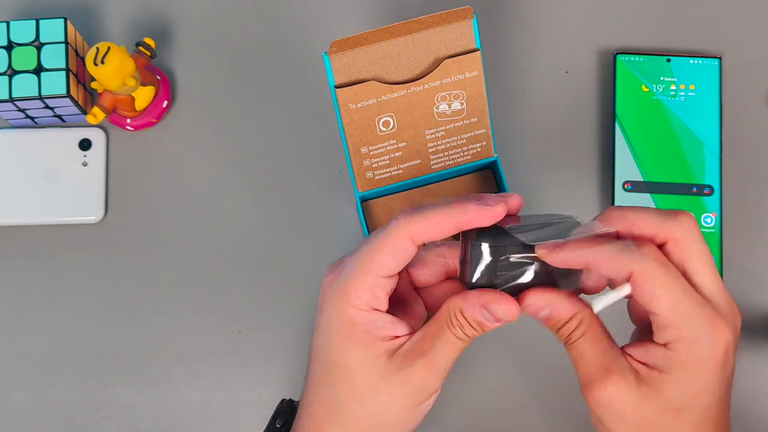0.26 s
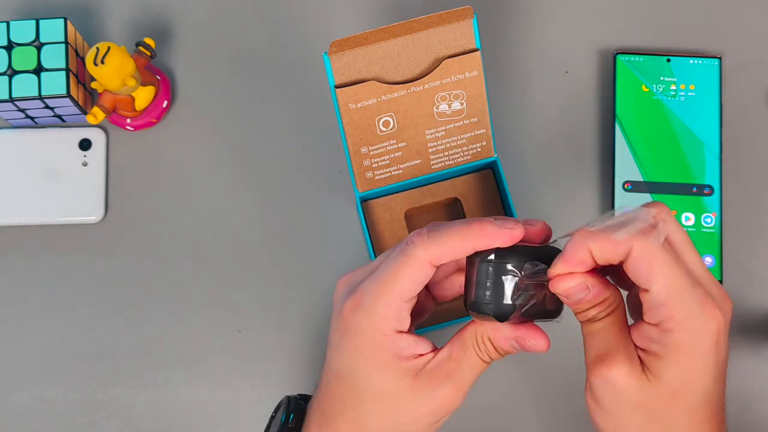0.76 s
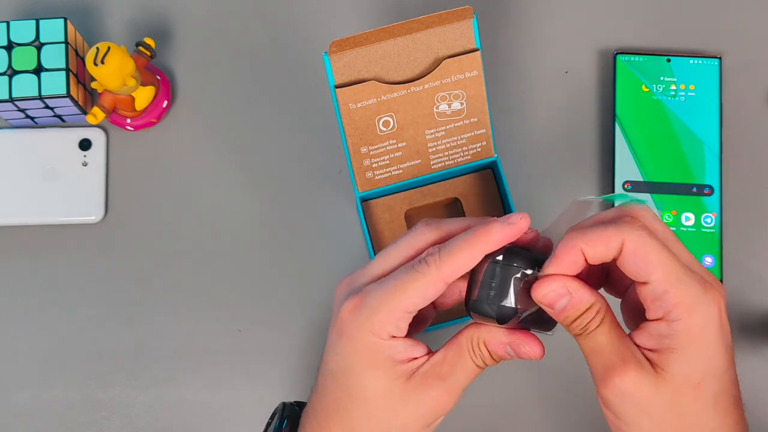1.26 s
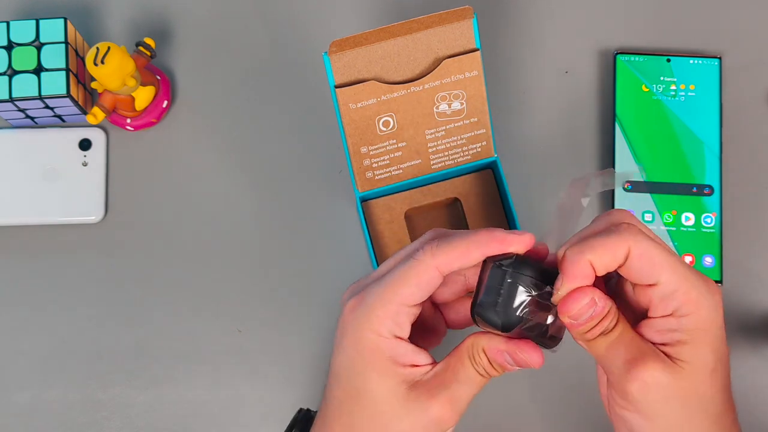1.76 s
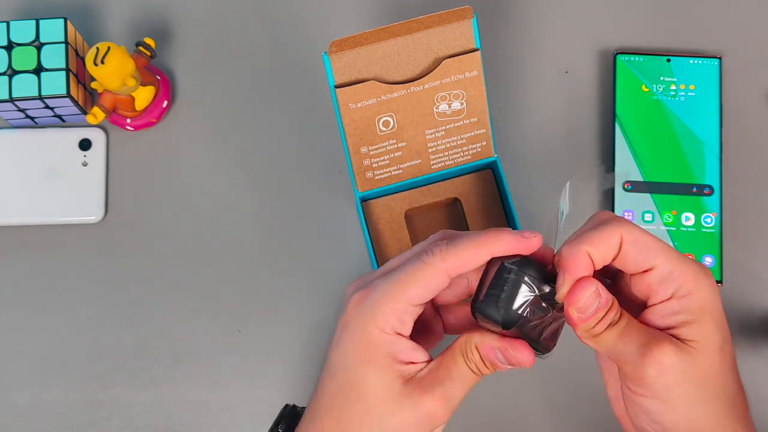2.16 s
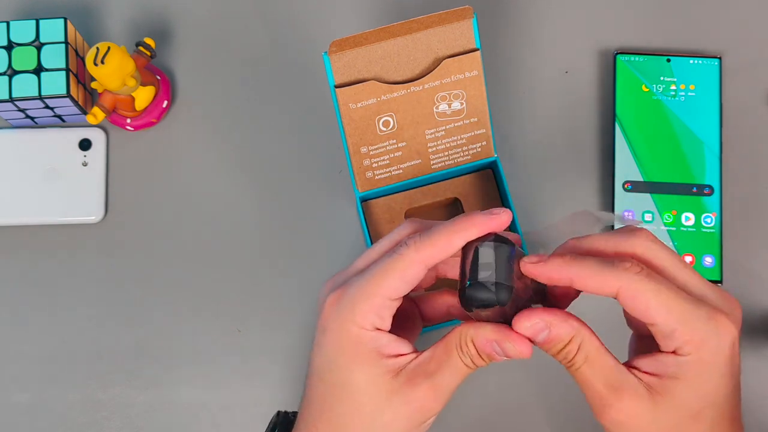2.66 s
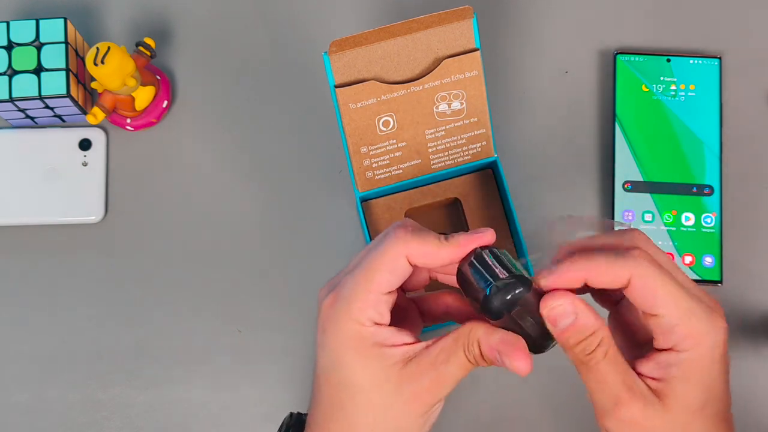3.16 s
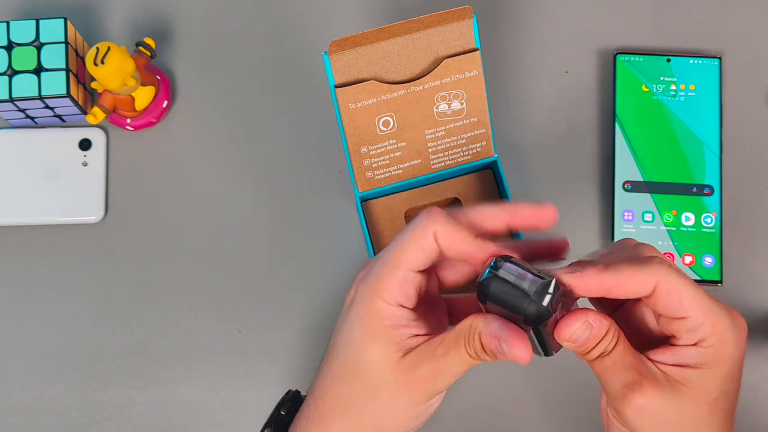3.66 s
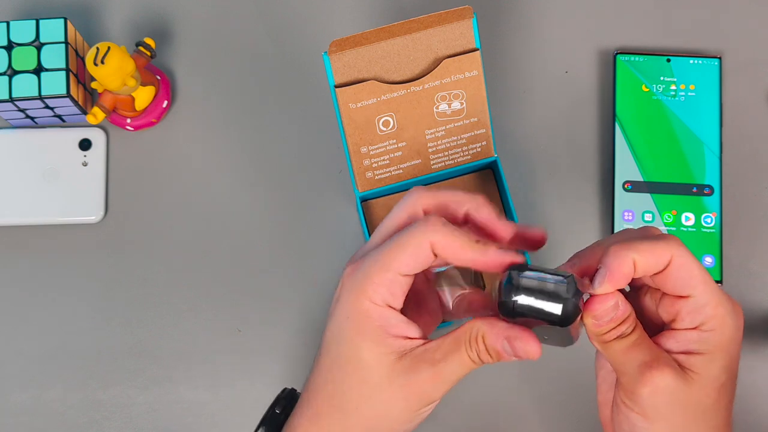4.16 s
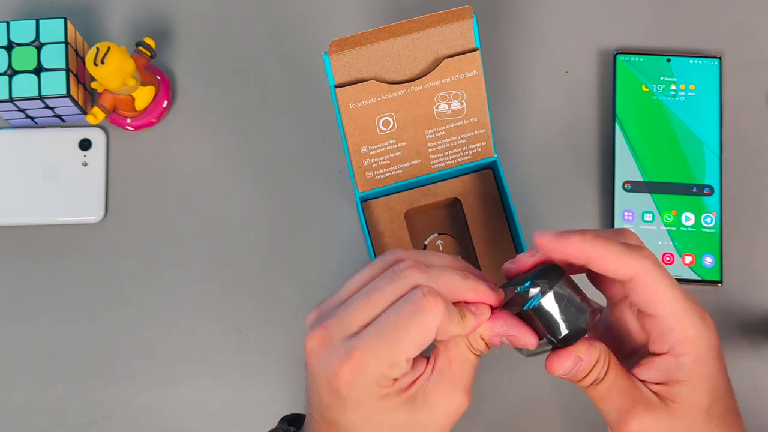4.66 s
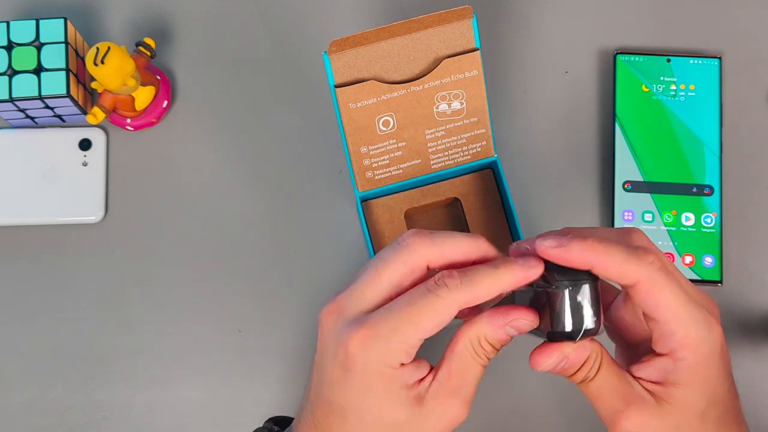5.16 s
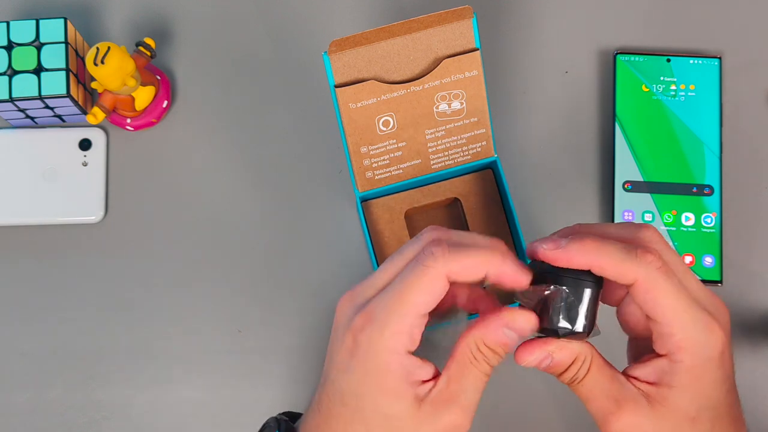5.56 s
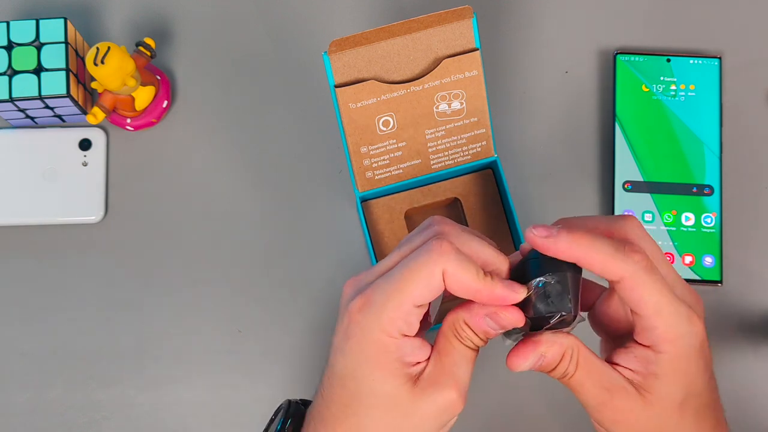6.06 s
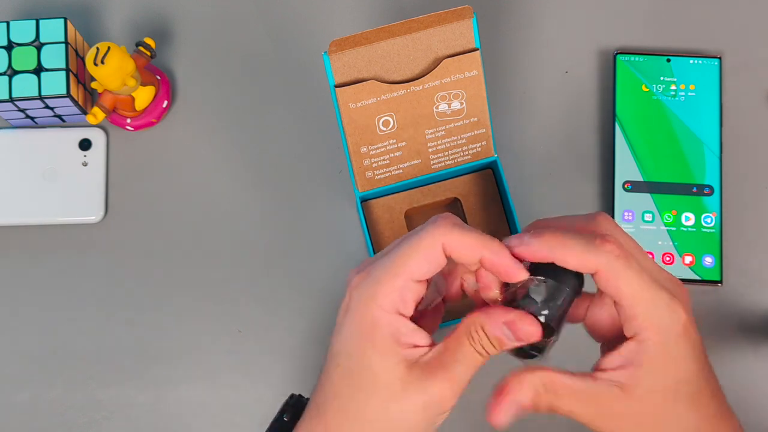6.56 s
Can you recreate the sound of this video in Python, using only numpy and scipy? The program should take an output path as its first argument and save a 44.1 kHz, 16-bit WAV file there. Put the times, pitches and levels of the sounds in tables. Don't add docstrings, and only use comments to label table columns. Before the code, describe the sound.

Close, dry crackles of peeling plastic wrap, a quick sticky zip, one loud pop, then thick crinkling in a quiet furnished room.

```python
import sys
import numpy as np
from scipy import signal
from scipy.fft import rfft, irfft
from scipy.io import wavfile
from scipy.ndimage import uniform_filter1d

SR = 44100
rng = np.random.default_rng(int(sys.argv[2]) if len(sys.argv) > 2 else 0)


def convert_level_to_amplitude(level_db):
    exponent = np.asarray(level_db, float) / 20
    return 10 ** exponent


def put_to_file(sound):
    columns = np.atleast_2d(sound).T
    safe = np.clip(columns, -1, 1)
    whole_steps = np.round(safe * 32767)
    wavfile.write(sys.argv[1], SR, whole_steps.astype(np.int16))


N = 300762
LEAD = 32

# (time [s], level [dB], brightness [dB per octave], large fold joins in [dB])
FOLD_SNAPS = [(0.4276, -48.5, 3, -11), (0.5908, -40, -9.5, -8), (0.6515, -57.5, -2, 15.5),
              (0.7751, -50, -10.5, -3.5), (0.9858, -50, 0, -47), (1.6247, -47.5, 0.5, -1),
              (1.6624, -49.5, 1, 13), (1.6738, -47, 2, 10), (2.3732, -48.5, 4, 13), (2.7469, -72, -9.5, 30),
              (2.9037, -50.5, -4, -4), (2.9272, -57.5, 7.5, 0), (3.3205, -35, -7, 0), (3.8573, -39, -9, 1),
              (4.0783, -40.5, -2, 5), (4.3253, -54, 7, 5), (4.33, -40.5, 0, -5), (4.3681, -45, 7, 5),
              (4.408, -39, -5.5, 11), (4.5563, -53, 2, -17), (4.9509, -36.5, -7, 9.5),
              (5.0838, -49.5, -14, 18), (5.1285, -45, -5, 14), (5.2947, -36.5, -3, -10),
              (5.3586, -44.5, -8, 6.5), (5.942, -37.5, -4.8, 2.5), (6.1924, -40.5, 14, -17),
              (6.2621, -48.5, -15, 0), (6.3422, -45.5, -8, -10)]
RIDGE_SNAPS = [(1.2905, -55.5, -3, -6), (1.4052, -58.5, -4.5, -8), (2.196, -38, 5.5, -7),
               (2.4087, -39, 6, 10), (3.0166, -57, 0, -7), (3.3149, -54, 5, 16), (3.4549, -47, 7, -10),
               (3.8842, -34.5, -5.5, -22), (4.6944, -35.5, -3, 5), (5.09, -40, -5, 3),
               (5.4295, -37.5, -7.5, 5), (5.4662, -34.5, -2, 12.5), (5.6369, -62, -1, 13),
               (6.1051, -35, 0.5, 8), (6.3381, -48, -3, -19), (6.5135, -33, 1, -24), (6.55, -47, 7, -9),
               (6.5684, -47, 0, -11), (6.7453, -47, -3, -7), (6.7611, -38.5, -0.5, -1),
               (6.8074, -33, -6, -10)]
PANEL_SNAPS = [(1.036, -67, 5, -15), (1.2119, -61, 3, -12), (1.2858, -61.5, 1, 26),
               (1.3236, -58.5, -3.5, -6), (1.6557, -63, -9, 17), (1.7856, -23, -2.5, 3.0),
               (2.1385, -72, -13, -14), (2.3975, -37.5, 4, 4), (3.0212, -39, 4.5, -2),
               (3.3326, -32.5, 5.5, -5), (3.4346, -44, -0.5, 17.5), (3.484, -38, 1.5, -4),
               (3.5124, -39, -1.5, -6), (3.929, -27, 4, 1), (4.1209, -41, -0.5, -8), (4.241, -56, -4, 13),
               (4.35, -39.5, 3, 11.5), (4.3954, -37.5, -2.5, 2.5), (4.7274, -42.5, -0.5, -1),
               (4.932, -56, 9, 0), (5.658, -48, 1.5, -10), (6.0587, -43.5, -2.5, -5),
               (6.0859, -40.5, -3, -10), (6.1621, -47.5, 3.5, 3), (6.1782, -47.5, -10, -5),
               (6.2415, -57.5, 0, 15), (6.4039, -52, 6, -5), (6.4351, -49, 5, 1)]
SHEET_SNAPS = [(0.1748, -46.5, -5, 15), (0.3764, -65, 0, 0), (0.7399, -65, 4, -8.5),
               (1.3615, -48, 4.5, -10), (1.4376, -42, -5, -8), (1.7214, -32.5, -0.5, -8),
               (2.121, -55, -10.5, 4), (2.175, -83, -3, 10), (2.3652, -55, -3, 1), (2.4184, -45.5, 5.5, 10),
               (3.1313, -53, -2.5, 12), (3.2869, -53.5, -3, 5), (3.5228, -55, -15, 14),
               (3.8408, -37.5, -1, 19.5), (4.2154, -52, -4, 5), (4.5236, -46.5, 2.5, -8),
               (4.7193, -43.5, -4, 13), (4.8297, -41, 7, -15), (5.1778, -41.5, -1.5, -4),
               (5.4212, -60.5, -11, 9), (5.4474, -68, 5, 5), (5.5044, -48.5, -7.5, 8),
               (5.6526, -58, -1, 15.5), (5.8209, -62, -12, -11), (5.853, -31, -0.5, -6.5),
               (6.0474, -41.5, 1, -10), (6.5586, -42, -4, 0), (6.5858, -47.5, -10, 15),
               (6.6204, -47.5, -3.5, 3), (6.787, -48.5, 4, 6)]
CREASE_SNAPS = [
    (0.2417, -45.5, 2, 13),
    (0.5455, -34.5, -7.5, -3),
    (1.4285, -50, 6, 5),
    (3.4897, -40, 0, 17),
    (4.5016, -47, -3, 5),
    (4.8453, -28, -2, -31),
    (6.521, -31, 0.5, 5.5),
]
TAUT_SNAPS = [(0.3842, -77.5, -14, -16), (0.7461, -74, 3, 5), (1.0668, -52, 8, -18),
              (1.1994, -62.5, 3.5, 5), (2.3774, -34.5, 1.5, -25), (2.5291, -64, -1, 9.5),
              (3.9049, -35, 8, -4), (4.037, -38, 0, -1), (4.0591, -38.5, 1.5, 2.5), (4.246, -66, -22, 11),
              (4.2537, -48, -2, -18), (4.2885, -35, 0.5, 8.5), (4.678, -42, 2, -2), (4.685, -54, -4, -2),
              (4.7927, -40.5, 7.5, 5), (4.8221, -40, 9, -22.8), (4.8415, -46, 6, -4), (4.8605, -47, 6, -17),
              (4.912, -39, 2, -5.5), (5.0979, -31.5, 3, 6.5), (5.2613, -61, 0, 7), (5.8403, -53, 7, 10),
              (5.9951, -39, 0, 5.5), (6.3877, -61, 8, 15), (6.418, -40, 9.5, -3), (6.4574, -34, 4, 0.5),
              (6.6125, -47.5, 2, 2), (6.6777, -41.5, 7, -19), (6.7527, -69, -17, 19)]
# (snaps, large fold [dB], panel [dB], ridge [dB], crease [dB], fine edge [dB])
KINDS = [
    (FOLD_SNAPS, -14.5, -16, 0, -4.5, -15.5),
    (RIDGE_SNAPS, -15, -9.5, 0, -9, -12),
    (PANEL_SNAPS, -11.5, 0, -6.5, 0, -11),
    (SHEET_SNAPS, -11.5, -9.5, -1.5, 0, -9),
    (CREASE_SNAPS, -22.5, -11, -12.5, 0, -20.5),
    (TAUT_SNAPS, -11, 0, 0, -3.5, -8.5),
]
SNAPS = sorted((*row, kind[1:]) for kind in KINDS for row in kind[0])
PARTS_HZ = [900, 2600, 5700, 8900, 13200]
# (frequency [Hz], t60 [s])
SNAP_T60 = [(500, 0.019), (2000, 0.011), (6000, 0.011), (15000, 0.0092)]
EARLIER_PARTS = (-48.5, -47, -43.5, -41.5, -50)
SHARP_TIMES = [1.4376, 1.7214, 1.7856, 2.196, 2.3774, 2.4087, 3.484, 3.9049, 4.408, 6.0587, 6.1924, 6.6777,
               6.8074]
# (duration [s], head start [s], times [s])
TEARS = [
    (.004, .0004, [.5467, 1.4285, 2.4184, 3.1313, 3.3326, 3.4346, 3.4889, 3.5124, 5.2947, 4.2557, 3.929, 5.0978, 6.4582, 4.912]),
    (.008, .001, [1.1994, 1.3236, 1.6247, 6.3422, 3.8408, 4.0591, 4.1209, 4.2161, 5.942]),
    (.013, .004, [3.4549, 3.8573, 4.0783, 4.2883, 4.3306, 4.3686, 5.1285, 5.5046]),
]
# (time [s], centre [Hz], level [dB])
SNAP_TINTS = [(0.4276, 2330.0, 10), (0.7751, 2120, 9.5), (1.0668, 6000.0, 6), (1.3615, 5640, 6),
              (1.6624, 6000.0, 11.5), (1.7856, 15100, 13), (3.1313, 6460, 6.5), (3.3205, 13600.0, 6),
              (3.4346, 6400.0, 11), (3.5124, 13200.0, 8), (3.8408, 12800.0, 5), (3.8842, 12000.0, 7.7),
              (3.9049, 8400.0, 3), (4.037, 4860, 6), (4.0591, 2960, 7.5), (4.33, 2360, 16), (4.3954, 1630, 1),
              (4.408, 11500, 15), (4.6944, 2730, 5.5), (4.7927, 3620, 7.5), (4.912, 2470, 5.5),
              (4.9509, 2710, 8.5), (5.4295, 1380, 7.5), (5.4652, 4940, 3.5), (5.658, 1750, 7.5),
              (5.9951, 1340, 9), (6.0474, 1230, 12), (6.0587, 1540, 13.5), (6.0587, 7160, 11),
              (6.0859, 5560, 8.5), (6.1051, 2360, 7.5), (6.1051, 9200, 10), (6.2621, 5350, 6),
              (6.4574, 1230, 9.5), (6.521, 14800.0, 13), (6.5586, 14000.0, 8), (6.6204, 1900, 11),
              (6.6777, 10400, 5.5), (6.7611, 1940.0, 6.5),
              (0.1748, 1340, -7), (0.4276, 8100, -3), (0.7751, 5230, -7), (1.3615, 11000, -5),
          (1.3615, 14600, -21), (1.6247, 3680, -14), (1.6624, 11200.0, -5.3), (1.7214, 11600.0, -11),
          (1.7856, 2620, -6.5), (1.7856, 5500, -8), (2.196, 13200, -15), (2.3774, 2510, -11),
          (2.3774, 12400.0, -11), (3.1313, 1050, -10.5), (3.4346, 1460, -15), (3.8408, 1230, -18),
          (3.929, 1810, -4), (3.929, 11000, -9.5), (4.037, 1910, -10), (4.3954, 2170, -11),
          (4.678, 14800.0, -9), (4.6944, 4730, -9), (4.7927, 13200.0, -10), (4.8453, 9200.0, -11),
          (4.9509, 2020, -5), (5.0973, 6400.0, -6), (5.4652, 2870, -10), (6.0587, 10000.0, -3.7),
          (6.0859, 1770.0, -8), (6.0859, 11200.0, -8), (6.1051, 6200, -8), (6.1051, 13900, -4),
          (6.1794, 5200.0, -4.5), (6.1924, 10000.0, -5.9), (6.2621, 3580, -11), (6.418, 3300, -13),
          (6.4574, 7260, -10), (6.4574, 14800.0, -7), (6.7611, 14400.0, -7.9), (6.8074, 7200.0, -6),
              (.1748, 13000, -5), (.5467, 2240, 5.5), (1.7856, 695, -3.5), (2.196, 2880, 11.5),
         (3.0212, 1640, 2.5), (3.0212, 4520, -8), (3.929, 2840, 5.5), (5.0973, 686, -10), (5.0973, 2630, 9),
         (5.0973, 3670, 6), (5.4295, 2180, -8), (6.1051, 5160, 10.5), (1.4376, 3100, -10),
         (4.9509, 3280, 0), (6.8074, 3020, 0)]
# (time [s], centre [Hz], level [dB])
THUDS = [(.7751, 845, 13.5), (3.3326, 503, 12), (3.484, 202, 24), (3.8408, 480, -2), (4.2885, 300, 8),
         (4.408, 250, 16), (4.678, 300, 18), (4.7274, 353, 27), (4.7927, 300, 14), (4.9509, 470, 9),
         (5.0973, 360, 18), (5.3586, 240, 30.5), (5.4295, 410, 19.5), (5.4652, 252, 10),
         (5.4652, 750, -1.5), (5.853, 300, 15), (5.9951, 276, 19), (6.1051, 550, 3.5), (6.418, 650, 12)]
# (frequency [Hz], width [Hz], level [dB])
CASE = [(1983, 140, 5), (3890, 96, 2.5), (6300, 190, -0.5), (8400, 190, 0), (869, 30, 4.5), (660, 210, -1)]
SLIP_PARTS = (-18.5, -9.5, -10, 0.5, -17.5)
# (frequency [Hz], width [Hz], level [dB])
SLIP_TINT = [(6400, 900, 4), (4400, 700, -4.5), (1970, 200, -8), (15600, 900, -9), (5500, 500, 4)]
# (delay [s], level [dB])
SLIP_ECHO = (0.000386, -5)
# (time [s], peak level [dB], centre [Hz])
TICKS = [(.013, -38.5, 2220), (.105, -45, 12000), (.229, -43.5, 1800), (0.454, -50, 2000),
         (.912, -50, 10900), (1.091, -52, 11000), (1.110, -50, 9000), (1.765, -40, 9500),
         (1.979, -46, 12000), (2.138, -61, 4500), (2.175, -54, 4600), (2.314, -59, 7900),
         (2.58, -54.5, 890), (2.804, -62, 6500), (2.833, -54, 6500), (2.92, -47, 8000), (2.952, -52, 2180),
         (3.255, -58, 2000), (3.302, -47, 1200), (3.476, -40, 1800), (3.713, -67, 1990), (3.780, -55, 2000),
         (4.021, -29.5, 2260), (4.265, -51, 3500), (4.400, -24, 9000), (4.326, -41, 12000),
         (5.165, -29, 5000), (5.619, -53, 2800), (6.412, -32, 1850), (6.414, -38, 10000),
         (6.434, -32, 2200), (6.464, -25, 9000), (6.605, -45, 11000)]
# (time [s], level [dB])
CRACKLE = [(0, -63), (.6, -69), (1.1, -64), (1.8, -69), (2.5, -62), (2.75, -84.5), (3.7, -63.5),
           (3.95, -43), (4.6, -65), (4.85, -52.5), (5.75, -54), (6.0, -50), (6.82, -78)]
# (frequency [Hz], level [dB per Hz])
FILM = [(180, 8), (300, -2), (645, -4.5), (2650, -1), (6520, 1.5), (8640, -1), (16000, -9.5)]
# (middle time [s], length [s], level [dB], centre [Hz])
RUSTLES = [(0.242, 0.019, -43.5, 8800), (0.396, 0.033, -51.5, 10900), (1.201, 0.018, -49.5, 8800),
           (1.322, 0.034, -53.5, 6800), (1.679, 0.054, -50.5, 5970), (2.694, 0.024, -68.5, 9400),
           (2.76, 0.018, -67.5, 8870), (3.308, 0.076, -57.5, 5930), (3.491, 0.046, -44.5, 7000),
           (3.757, 0.059, -57.5, 6500), (3.826, 0.042, -48.5, 4380), (4.286, 0.12, -47, 5550),
           (5.504, 0.015, -44.5, 5000), (5.664, 0.027, -50.5, 6000), (6.427, 0.038, -40.5, 5950)]
# (time [s], peak level [dB], pitch [Hz])
BUMPS = [(0.170, -46, 85), (0.221, -49.5, 62), (1.285, -63, 177), (2.398, -44.5, 86), (3.509, -45, 92),
         (3.837, -55, 73.5), (4.111, -47.5, 112), (4.283, -42, 104), (4.31, -45, 96), (4.948, -62, 123),
         (5.094, -41, 91), (5.994, -49, 132), (6.459, -51, 58)]
# (time [s], level [dB])
HANDLING = [(0.0, -52), (0.07, -66), (.2, -65), (.4, -73), (.6, -56.5), (.8, -73), (2.98, -69),
            (3.4, -65.5), (3.7, -68), (4.3, -59), (4.6, -62), (5.1, -58.5), (5.55, -58), (6.3, -57.5),
            (6.82, -58)]
# (delay [s], level [dB])
ECHOES = [(.0022, -23), (.0041, -12), (0.018, -45), (0.019, -25.5)]
# (frequency [Hz], t60 [s])
ROOM = [(300, 0.27), (790, 0.47), (2090, 0.46), (5510, 0.44), (10000, 0.39), (14600, 0.24)]
# (frequency [Hz], level [dB per Hz])
HUM = [(15, -60), (25, -20), (102, -0.5), (263, -7), (405, -19), (545, -22.5), (818, -16), (1290, -21.5),
       (3080, -24), (3340, -28.5), (7710, -29), (16000, -35.5)]
# (frequency [Hz], width [Hz], level [dB])
DUCT = [(101, 4.5, 4.5), (116, 15, 5), (176.3, 6.6, 7), (417, 19, 12)]


def snaps(gain_db=36.0, lumpy_db=2.0):
    near, around = np.zeros((2, N))
    run = slips()
    shapes, hz = bursts(count=len(SNAPS) + len(run))
    facets = rng.standard_normal((len(SNAPS), len(hz)))
    facets = evened(uniform_filter1d(facets, size=24, axis=1))
    colours = [release(parts(*row[1:]), hz, lumpy_db * facet + tint)
               for row, facet, tint in zip(SNAPS, facets, tints(hz))]
    delay_s, echo_db = SLIP_ECHO
    comb = 1 + convert_level_to_amplitude(echo_db) * np.exp(-2j * np.pi * hz * delay_s)
    slip_colour = comb * release(SLIP_PARTS, hz, humps(SLIP_TINT, hz))
    colours += [convert_level_to_amplitude(db) * slip_colour for _, db in run]
    shapes[len(SNAPS):] = slip_shapes(shapes[len(SNAPS):])
    shapes, early = torn(sharpened(shapes))
    desk = convert_level_to_amplitude(humps([(6500, 690, -7.5), (13600, 2400, 2.0)], hz))
    spread = convert_level_to_amplitude(humps([(5430, 990, -0.86), (2730, 1500, -0.45)], hz))
    add(around, 0, irfft(release(EARLIER_PARTS, hz)))
    for row, shape, colour, head_s in zip(SNAPS + run, shapes, colours, early):
        add(near, row[0] - head_s - LEAD / SR, irfft(shape * colour * desk))
        add(around, row[0], irfft(colour * spread))
    return convert_level_to_amplitude(gain_db) * near, convert_level_to_amplitude(gain_db) * around


def bursts(count, rise=0.024, size=1024):
    t, hz = np.arange(size) / SR, np.fft.rfftfreq(size, 1 / SR)
    noise = rfft(rng.standard_normal((count, size)))
    out = np.zeros((count, size))
    for k, (_, t60) in enumerate(SNAP_T60):
        share = read([(f, j == k) for j, (f, _) in enumerate(SNAP_T60)], hz)
        decay = convert_level_to_amplitude(-60 * t / t60) * np.minimum(t / (rise * t60), 1)
        out += irfft(noise * share) * decay
    return flattened(rfft(np.roll(out, LEAD, axis=1))), hz


def flattened(spectra, size=28):
    return spectra / np.sqrt(uniform_filter1d(abs(spectra) ** 2, size=size, axis=-1))


def parts(db, bright_db, fold_db, kind):
    octaves = np.log2(np.divide(PARTS_HZ[1:], PARTS_HZ[2]))
    return db + np.array(kind) + np.r_[fold_db, bright_db * octaves]


def release(parts_db, hz, facets_db=0, low_db=-30, top_db=-3.0):
    colour = [(120, parts_db[0] + low_db), *zip(PARTS_HZ, parts_db), (16000, parts_db[-1] + top_db)]
    log_gain = (read(colour, hz) + humps(CASE, hz) + facets_db) * np.log(10) / 20
    both_sides = np.r_[log_gain, log_gain[-2:0:-1]]
    return np.conj(np.exp(signal.hilbert(both_sides)))[:len(hz)]


def tints(hz, share=0.12, widest_hz=900, low_share=0.33):
    out = np.zeros((len(SNAPS), len(hz)))
    for s, centre_hz, db in SNAP_TINTS:
        width_hz = min(share * centre_hz, widest_hz)
        out[nearest_snap(s)] += humps([(centre_hz, width_hz, db)], hz)
    for s, centre_hz, db in THUDS:
        out[nearest_snap(s)] += humps([(centre_hz, low_share * centre_hz, db)], hz)
    return out


def slips(count=15):
    start_s, quicken_s = 0.4655, 0.503
    slow_gap_s, quick_gap_s, jitter = 0.0075, 0.0042, 0.12
    level_db, swell_db, swell_s = -47.5, -36, 0.012
    slow = np.arange(count) * slow_gap_s
    turn = quicken_s - start_s
    lag = np.minimum(slow, turn) + np.maximum(slow - turn, 0) * quick_gap_s / slow_gap_s
    lag = lag + jitter * quick_gap_s * rng.standard_normal(count)
    return list(zip(start_s + lag, level_db + swell_db * np.exp(-lag / swell_s)))


def slip_shapes(shapes, hold_s=0.0029, t60=0.009):
    alike = (1.82 * shapes[-1] + 0.54 * shapes) * shapes[-2]
    lag = np.maximum(np.arange(1024) / SR - hold_s, 0)
    return rfft(np.roll(irfft(alike), -40, axis=1) * convert_level_to_amplitude(-60 * lag / t60))


def sharpened(shapes, t60=.006, rest_db=-14):
    out = shapes.copy()
    t = np.maximum(np.arange(2 * shapes.shape[1] - 2) - LEAD, 0) / SR
    for s in SHARP_TIMES:
        k = nearest_snap(s)
        jump = rfft(irfft(out[k]) * (convert_level_to_amplitude(-60 * t / t60) + convert_level_to_amplitude(rest_db)))
        out[k] = flattened(jump, size=60)
    return out


def torn(shapes):
    out, early = shapes.copy(), np.zeros(len(shapes))
    t = np.arange(2 * shapes.shape[1] - 2) / SR
    for length_s, head_s, moments in TEARS:
        fade = np.sqrt(np.clip(1 - t / length_s, 0, 1)) * np.minimum(t / (head_s + 1e-4), 1)
        for s, jumps in zip(moments, rng.standard_normal((len(moments), len(t)))):
            k = nearest_snap(s)
            out[k] = flattened(out[k] * rfft(jumps * fade))
            early[k] = head_s
    return out, early


def nearest_snap(s):
    return abs(np.array([row[0] for row in SNAPS]) - s).argmin()


def ticks(octaves=0.51):
    out = np.zeros(N)
    shapes, hz = bursts(count=len(TICKS))
    for (s, db, centre_hz), shape in zip(TICKS, shapes):
        tick = irfft(shape * octave_bell(hz, centre_hz, octaves))
        add(out, s - LEAD / SR, convert_level_to_amplitude(db) * tick / abs(tick).max())
    return out


def crackle(per_s=300, spread_db=10.0, gain_db=-6.5):
    shapes, hz = bursts(count=24)
    when, which, size = rng.random((N, 3)).T
    train = (when < per_s / SR) * convert_level_to_amplitude(-spread_db * np.log(size + 0.038))
    kinds = (which * len(shapes)).astype(int)
    grains = irfft(shapes * convert_level_to_amplitude(read(FILM, hz) + humps(CASE, hz)))
    out = sum(signal.oaconvolve(train * (kinds == k), grain)[:N] for k, grain in enumerate(grains))
    return evened(out) * convert_level_to_amplitude(over_time(CRACKLE) + gain_db)


def rustles(octaves=1.0, grainy_db=2.5, size=4096):
    out, hz = np.zeros(N), np.fft.rfftfreq(size, 1 / SR)
    t = (np.arange(size) - size / 2) / SR
    draws = rng.standard_normal((len(RUSTLES), 2, size))
    for (s, length_s, db, centre_hz), (noise, grain) in zip(RUSTLES, draws):
        band = octave_bell(hz, centre_hz, octaves) * convert_level_to_amplitude(humps(CASE, hz))
        grain_db = grainy_db * evened(uniform_filter1d(grain, size=60))
        swell = np.exp(-(2 * t / length_s) ** 2) * convert_level_to_amplitude(db + grain_db)
        add(out, s + t[0], swell * evened(irfft(rfft(noise) * band)))
    return out


def bumps(t60=0.07, rise_s=0.002, puff_db=-3.0, puff_t60=0.04, puff_hz=450):
    out, t = np.zeros(N), np.arange(SR // 4) / SR
    puffs = evened(band_passed(rng.standard_normal((len(BUMPS), len(t))), 120, puff_hz))
    for (s, db, hz), puff in zip(BUMPS, puffs):
        ring = convert_level_to_amplitude(-60 * t / t60) * np.sin(2 * np.pi * hz * t)
        contact = convert_level_to_amplitude(puff_db - 60 * t / puff_t60) * puff
        add(out, s, convert_level_to_amplitude(db) * (ring + contact) * np.minimum(t / rise_s, 1))
    return out


def handling(low_hz=190, high_hz=560, lumpy_db=2.5, gain_db=-7.5):
    noise, lumps = rng.standard_normal((2, N))
    rub = evened(band_passed(noise, low_hz, high_hz))
    lumps_db = lumpy_db * evened(uniform_filter1d(lumps, size=900))
    return rub * convert_level_to_amplitude(over_time(HANDLING) + gain_db + lumps_db)


def echoes(x):
    out = x.copy()
    for s, db in ECHOES:
        add(out, s, convert_level_to_amplitude(db) * x)
    return out


def room(x, tail_db=-5.0, onset_s=0.0013, count=3):
    out, t = np.zeros(N), np.arange(N) / SR
    for k in range(count):
        hz, lag, z = signal.stft(rng.standard_normal(SR // 2), SR, nperseg=128)
        decay = convert_level_to_amplitude(-60 * lag / read(ROOM, hz)[:, None])
        tail = signal.istft(z * decay, SR, nperseg=128)[1]
        tail = tail * np.minimum(np.arange(len(tail)) / SR / onset_s, 1)
        share = np.sqrt(2 / count) * np.cos(np.pi * (7 * t + k / count))
        out += signal.fftconvolve(x * share, tail / np.linalg.norm(tail))[:N]
    return convert_level_to_amplitude(tail_db) * out


def hum(level_db=-63, patchy_db=1.5):
    hz = np.fft.rfftfreq(2048, 1 / SR)
    a, b, patches = rng.standard_normal((N // 512 + 5, len(hz), 3)).T
    patches = uniform_filter1d(patches, size=6, axis=0)
    patches = evened(uniform_filter1d(patches, size=8, axis=1))
    colour_db = (read(HUM, hz) + humps(DUCT, hz))[:, None]
    z = (a + 1j * b) * convert_level_to_amplitude(colour_db + patchy_db * patches)
    return convert_level_to_amplitude(level_db) * evened(signal.istft(z, nperseg=2048, noverlap=1536)[1][:N])


def evened(x):
    return x / np.sqrt(np.mean(x ** 2) + 1e-20)


def read(points, hz):
    f, value = np.transpose(points)
    return np.interp(np.log(hz + 1), np.log(f + 1), value)


def over_time(points):
    return np.interp(np.arange(N) / SR, *np.transpose(points))


def humps(table, hz):
    return sum(db * np.exp(-((hz - f) / width) ** 2 / 2) for f, width, db in table)


def octave_bell(hz, centre_hz, octaves):
    return np.exp(-(np.log2((hz + 1) / centre_hz) / octaves) ** 2 / 2)


def band_passed(x, low_hz, high_hz):
    return signal.sosfilt(signal.butter(2, [low_hz, high_hz], "band", fs=SR, output="sos"), x)


def add(mix, s, sound):
    part = mix[max(round(s * SR), 0):][:len(sound)]
    part += sound[:len(part)]


def scene():
    near, around = snaps()
    small, knocks = crackle() + rustles(), bumps()
    small = small + ticks()
    reflected = echoes(near + small)
    ringing = room(around + small + convert_level_to_amplitude(7.0) * knocks)
    return (reflected + ringing + knocks + handling() + hum())[None]


def roll_off(x):
    return signal.sosfilt(signal.butter(12, 16970, fs=SR, output="sos"), x)


def record(dry, open_db=23.0, top_db=-18.0, edge_hz=15820, cut_hz=16750):
    dry = signal.sosfilt(signal.butter(3, 48, "high", fs=SR, output="sos"), dry)
    edge = signal.firwin(2047, edge_hz, window=("kaiser", 10), fs=SR)[None]
    cut = signal.firwin(255, cut_hz, window=("kaiser", 10), fs=SR)[None]
    below = signal.oaconvolve(dry, edge, "same")
    top = signal.oaconvolve(dry, cut, "same") - below
    power = np.diff(dry, prepend=0) ** 2
    usual = uniform_filter1d(power, size=1501, origin=750)
    attack = uniform_filter1d(power, size=64) > convert_level_to_amplitude(open_db) * usual
    gate = signal.oaconvolve(attack * 1., signal.windows.hann(101)[None] / 25, "same").clip(0, 1)
    return roll_off(below + convert_level_to_amplitude(top_db) * gate * top)


dry = scene()
out = record(dry)
put_to_file(out)
```